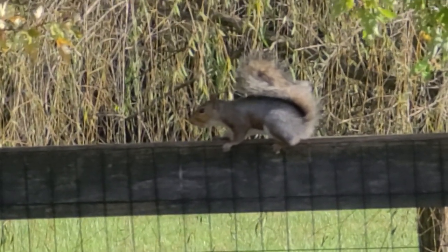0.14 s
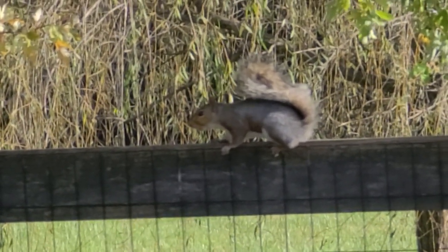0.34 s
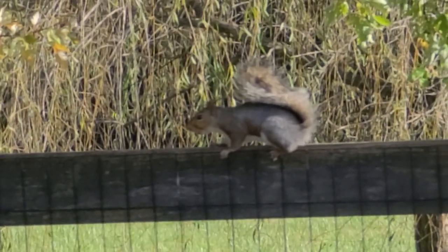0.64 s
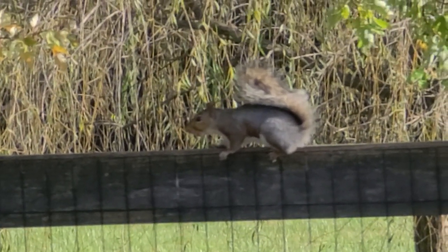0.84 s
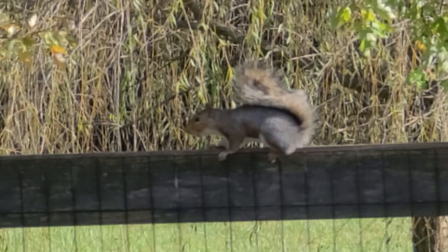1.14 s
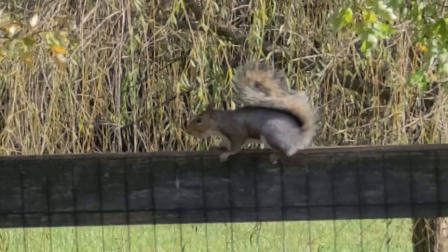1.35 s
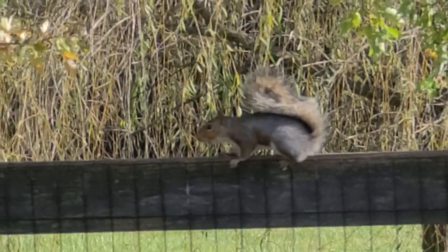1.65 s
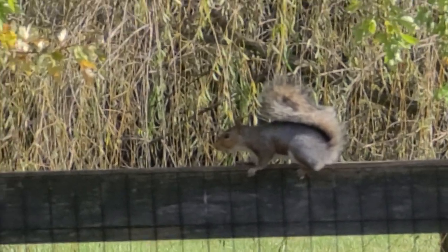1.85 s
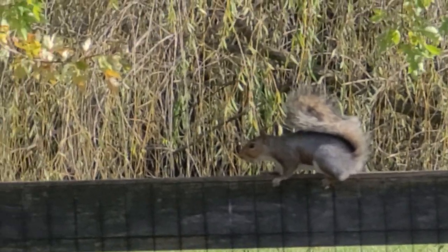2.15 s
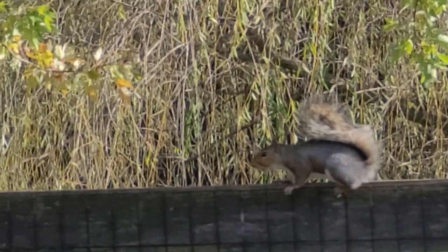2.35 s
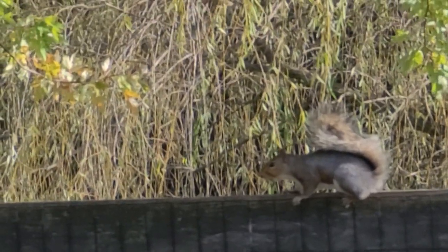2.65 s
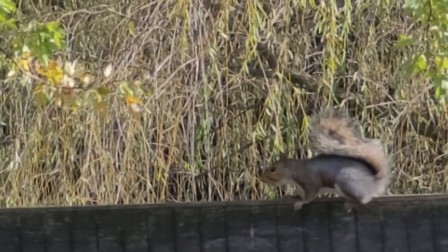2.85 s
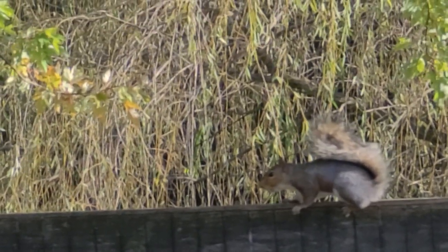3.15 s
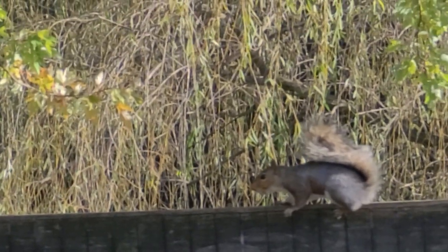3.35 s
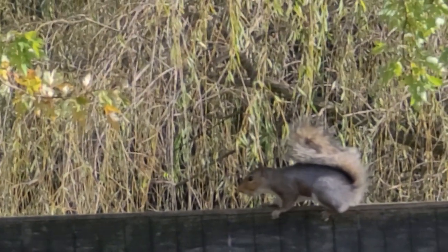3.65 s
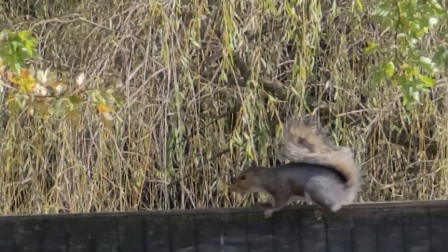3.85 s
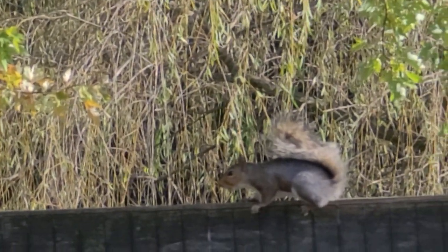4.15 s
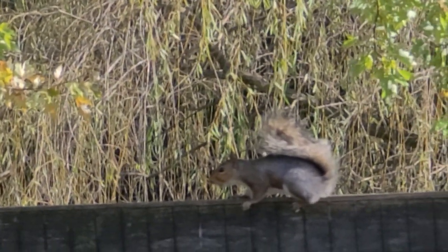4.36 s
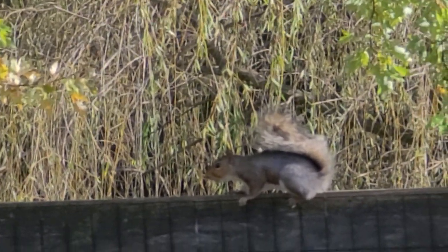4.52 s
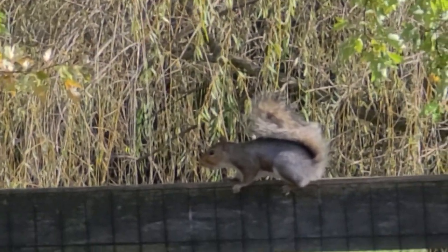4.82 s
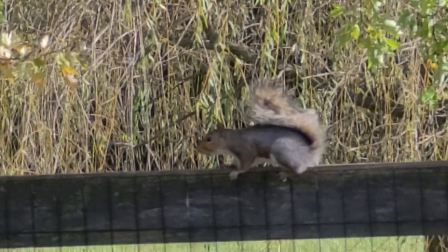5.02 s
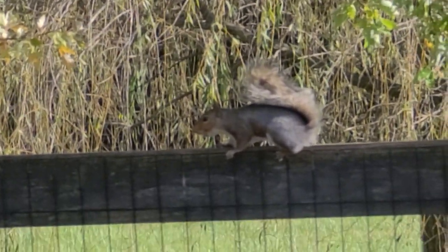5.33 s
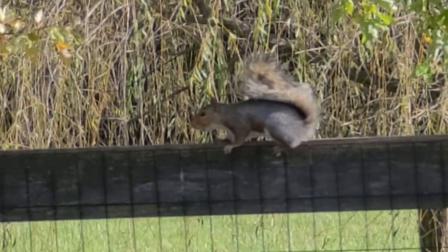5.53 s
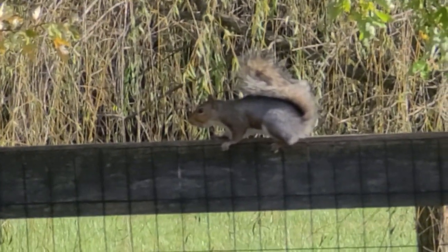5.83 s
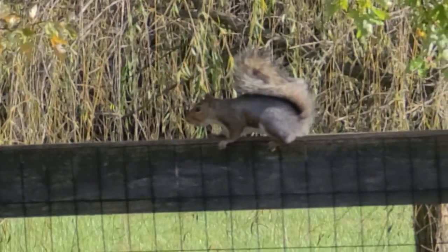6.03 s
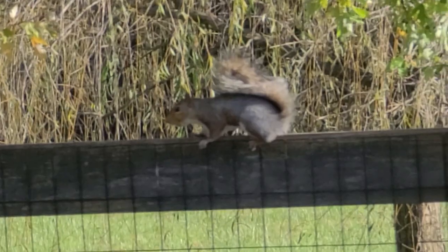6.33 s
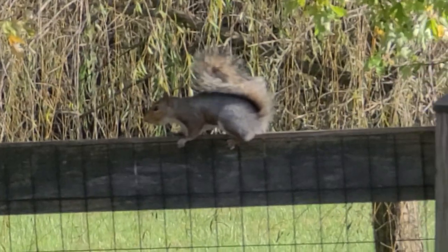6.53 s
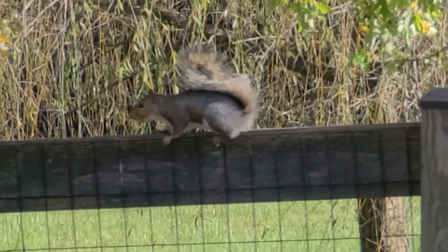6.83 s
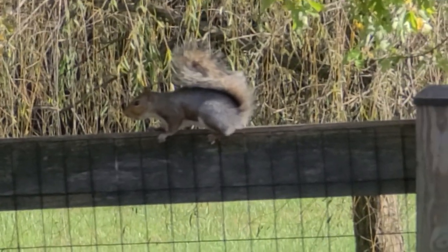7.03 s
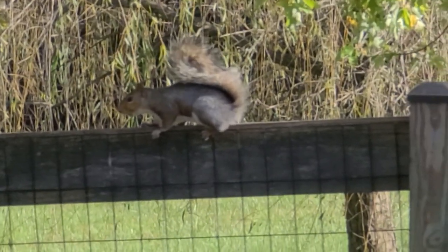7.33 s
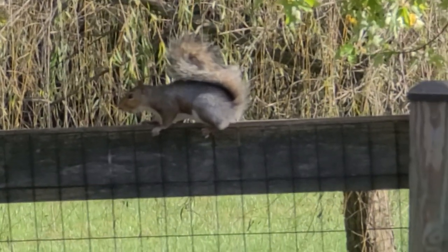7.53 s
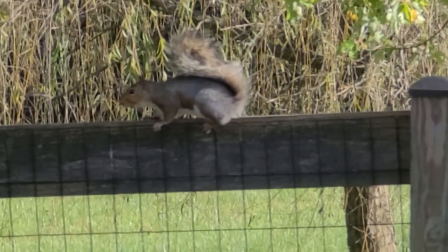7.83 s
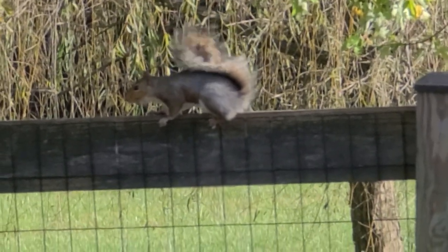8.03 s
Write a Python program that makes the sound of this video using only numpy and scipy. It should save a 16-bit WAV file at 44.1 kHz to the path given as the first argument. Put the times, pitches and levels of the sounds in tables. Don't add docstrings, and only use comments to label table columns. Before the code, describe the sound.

A quiet garden with deep, soft traffic rumble, airy leaf hiss and thin, high bush-cricket rasping on both sides. A very faint bird whistle dies away within 0.3 seconds. At 1.0 a squirrel calls close by, near centre: a tiny chirp, a harsh buzzy rasp, then a clearer nasal whine breaking into a small squeak, ending at 1.8. A distant vehicle drone swells faintly beneath, around 0.9 to 1.9. A similar, slightly louder call runs from 3.0 to 3.7. Cricket pairs and triplets chirp softly near 3.5, 3.9, 5.0, 5.6 and 6.4, with fainter ones farther off. A shorter, croaky call comes at 5.2 to 5.6. Tiny dry twig ticks crackle left at 6.0. Rough, noisy barks follow at 6.3, 6.6 (clipped), 7.2 (softer) and 8.0 (loudest). Short, dull fence and wall echoes colour the calls.

```python
import sys
import numpy as np
from scipy import signal
from scipy.io import wavfile
from scipy.ndimage import uniform_filter1d

SR = 44100
rng = np.random.default_rng(int(sys.argv[2]) if len(sys.argv) > 2 else 0)


def master(y):
    cut = np.clip(np.atleast_2d(y).T, -1, 1)
    pcm = np.round(cut * 32767)
    wavfile.write(sys.argv[1], SR, pcm.astype(np.int16))


def ratio_of_db(decibels):
    return 10 ** (np.asarray(decibels, float) / 20)


N = 360738
T = np.arange(N) / SR

FOLDS = {"shut": (.3, 1, -30), "chirp": (.04, 1, -30), "rasp": (.85, 1, -29), "strain": (.62, .45, -30),
         "clearing": (.45, 1, -32), "whine": (.06, 1, -36), "top": (.04, 1, -36), "break": (.04, 1, -36),
         "squeak": (.06, .03, -36), "fading": (.14, .03, -36), "done": (.3, .03, -36),
         "croak": (.9, 1, -28), "grind": (.7, .5, -28), "sag": (.6, .5, -30), "sob": (.2, .6, -34),
         "yelp": (.05, 1, -36), "puff": (.92, 1, -18), "bark": (.96, 1, -18), "closing": (.96, 1, -18),
         "spent": (.92, 1, -18)}
POSTURE = {"shut": (-71, -73, -75.5, -81, 0.6), "chirp": (-43.5, -42, -49, -62, 0.3),
           "rasp": (-46.5, -42.5, -57, -102, 0.5), "strain": (-45.5, -42, -61.5, -72, 0.53),
           "clearing": (-45.5, -45.5, -61, -53, 0.4), "whine": (-40.5, -52.5, -63.5, -52, 0.3),
           "top": (-40, -65, -70, -49.5, 0), "break": (-51.5, -59, -63, -56, 1),
           "squeak": (-60, -43, -60, -64, 0.2), "fading": (-65, -51, -64.5, -85, -0.02),
           "done": (-72, -64, -88, -78, 0.1), "croak": (-53, -47, -63.5, -79, 0.3),
           "grind": (-50.5, -44, -61.5, -85, 1.5), "sag": (-46, -48, -66, -66, .5),
           "sob": (-45, -52, -76, -55, .9), "yelp": (-60, -45.5, -74, -58, 2),
           "puff": (-81, -82, -58, -85, 3), "bark": (-49, -43.5, -48, -90, .35),
           "closing": (-53, -47, -60, -85, .35), "spent": (-63, -56, -75, -82, .35)}
# centre_hz, width_hz, level_db
TRACT = [
    [(2158, 450, 0.1)],
    [(2492, 280, 9), (2933, 273, 7), (3375, 340, -6)],
    [(750, 423, 16), (1140, 390, -34)],
    [(3860, 290, 10), (4080, 390, 26)],
]
# start_s, rasp_clears_s, voice_breaks_s, end_s, level_db
LONG_CALLS = [
    (1.02, 1.449, 1.643, 1.82, -0.76),
    (2.986, 3.385, 3.563, 3.705, -0.5),
]
# start_s, rasp_clears_s, voice_breaks_s, end_s, level_db
HOARSE_CALLS = [
    (5.17, 5.436, 5.53, 5.575, 0.1),
]
# start_s, hold_s, level_db, mouth_opening (0-1)
BARKS = [
    (6.337, 0.066, -0.6, 0.33),
    (6.566, .032, -2.5, 0.03),
    (7.203, 0.058, -3, 0.34),
    (8.012, .062, 0.4, .25),
]
# time_s, pitch_hz
PITCH_FIRST = [(1.025, 485), (1.05, 659.7), (1.13, 640), (1.3, 575), (1.48, 568.4), (1.635, 512.4),
               (1.665, 638), (1.72, 607), (1.79, 631)]
PITCH_SECOND = [(2.99, 500.7), (3.018, 661.3), (3.1, 631), (3.18, 572), (3.38, 567.5), (3.555, 522.5),
                (3.575, 630), (3.63, 586), (3.69, 658)]
PITCH_HOARSE = [(5.17, 599.6), (5.34, 590), (5.42, 515.4), (5.47, 551), (5.56, 584)]
BARK_HZ = 748
ATTACK_S, CHIRP_S, SETTLE_S, CLEAR_S, BREAK_S, FADE_S = .012, .0448, .015, .058, .012, .044
RASP_MIDDLE, WHINE_TOP = .67, .89
HOARSE_ATTACK_S = .036
BARK_ATTACK_S, BARK_RELEASE_S, BARK_SWELL_DB = .016, .03, 9

# start_s, strokes (count), first_gap_s, first_stroke_db
NEAR_CRICKET = [
    (.3237, 1, .05, -45.5),
    (3.494, 2, 0.05, -39.5),
    (3.945, 3, 0.048, -45.5),
    (4.996, 3, 0.05, -44.5),
    (5.6086, 3, 0.054, -44),
    (6.3725, 3, 0.051, -39),
]
FAR_CRICKET = [(.631, 1, .06, -62.5), (.757, 3, 0.059, -66.5), (1.732, 3, .063, -64), (2.13, 1, .06, -68),
               (2.39, 1, .06, -65), (2.792, 2, 0.063, -69), (3.665, 3, 0.044, -67.5),
               (3.886, 2, 0.034, -63), (4.101, 3, 0.11, -65), (4.421, 4, 0.045, -66),
               (5.925, 2, .067, -66.5), (6.651, 3, 0.063, -65), (7.047, 1, 0.056, -62),
               (7.265, 1, 0.062, -67), (7.811, 3, 0.058, -69)]
HIGH_CRICKET = [(.3815, 2, 0.058, -66), (1.128, 1, .055, -62), (2.313, 1, .055, -63.5),
                (2.788, 2, 0.053, -62), (3.408, 1, .055, -54), (4.038, 3, 0.05, -62.5),
                (4.692, 2, 0.038, -66), (4.789, 2, 0.061, -62.5), (5.492, 2, .056, -64),
                (6.024, 3, .051, -65), (6.767, 3, 0.046, -66), (7.32, 3, 0.047, -66.5),
                (8.071, 2, 0.052, -64)]
GAP_GROWTH, SWELL_DB = 1.074, 2
# time_s, level_db
TRILL_LEVEL = [(0, -74), (.5, -65), (1.0, -65), (2.1, -66), (2.6, -70), (4.1, -71)]
# start_s, peak_db
HEDGE_LOW = [(1.47, -52), (4.039, -53), (4.763, -68), (5.1, -57), (5.2, -59), (6.414, -60), (7.33, -58),
             (7.844, -55)]
HEDGE_HIGH = [(.133, -63), (.4065, -54), (.479, -54), (.86, -65), (1.035, -47.5), (1.181, -57),
              (1.338, -54), (1.449, -56), (1.611, -49), (2.132, -54), (2.718, -54), (3.009, -50),
              (3.16, -56), (3.306, -51.5), (3.429, -54.5), (3.892, -61), (4.402, -52), (4.919, -51),
              (5.581, -53), (6.997, -59), (7.073, -61), (7.512, -58), (8.0, -45)]
# tick (number), time_s
TICKER_BEAT = [(0, .10), (5, 1.515), (9, 2.84), (13, 4.095), (19, 5.905), (25, 7.98)]
# time_s, level_db
SHRILL_LEVEL = [(0, -75), (1.5, -73), (2.4, -78), (3.5, -62), (4.1, -68), (5.7, -74), (8.2, -78)]
CHORUS_DB = -68.5

# start_s, peak_db, left_right_db
TWIG = [
    (5.985, -43, 10),
    (5.9974, -49, 7.5),
    (6.006, -42, 14),
    (6.016, -34.5, 21.5),
]
# time_s, pitch_hz, level_db
WHISTLE = [
    (0.0, 2014, -72),
    (0.262, 2190, -85),
    (0.3, 1954, -90),
]
# start_s, peak_db
PASSING = [
    (.9, -69.5),
]
# frequency_hz, density_db (per Hz)
AIR = [(12, -38), (20, -15), (65, -1), (104, -10.5), (204, -25), (367, -20), (590, -24), (759, -22),
       (1060, -29.5), (3530, -33), (4540, -29.5), (6010, -43.5), (8180, -35), (10500, -42.5), (16000, -39)]
# frequency_hz, left_right_likeness (-1 to 1)
LIKENESS = [(60, 0.87), (180, 0.74), (550, 0.079), (1650, -0.00024), (4970, -0.23), (15000, -0.00069)]
# frequency_hz, left_right_db
TILT = [(60, -0.5), (110, -0.5), (200, -1.5), (380, -1.5), (700, 1), (1290, -0.5), (2380, -1.5), (4400, 0),
        (8120, 2), (15000, 4)]
# delay_s, level_db, side (0 left, 1 right)
ECHOES = [(.0009, -10, 0), (.0031, -8, 0), (.0042, -8, 1), (.0057, -9, 0), (.0083, -9, 1), (.021, -16, 0),
          (.029, -16, 1), (.044, -21, 0), (.063, -22, 1), (.081, -24, 0), (.104, -26, 1)]


def squirrel():
    calls = call_postures()
    rows = [row for call in calls for row in call]
    rough, odd, hiss_db = in_time([(s, *FOLDS[name]) for s, name, db in rows])
    *levels_db, opening = in_time([(s, *POSTURE[name]) for s, name, db in rows])
    levels_db = np.array(levels_db) + in_time([(s, db) for s, name, db in rows])
    folds, breath = vocal_folds(rough, odd)

    bark_opening, = in_time([(start + hold, wide) for start, hold, db, wide in BARKS])
    opening = np.clip(np.where(T < BARKS[0][0], opening, bark_opening), 0, 1)
    mode_shares = [(1,), (1 - opening, opening, opening), (1, 1), (1, 1)]
    voice = rms_one(resonate_twice(breath, 8500, 2800)) * ratio_of_db(levels_db[0] + hiss_db + 8)
    for modes, level_db, shares in zip(TRACT, levels_db, mode_shares):
        cavity = 0
        for (hz, width, db), share in zip(modes, shares):
            cavity = cavity + share * ratio_of_db(db) * resonate_twice(folds, hz, .9 * width)
        running_rms = np.sqrt(uniform_filter1d(cavity ** 2, size=1300) + 1e-9)
        voice = voice + ratio_of_db(level_db) * cavity / running_rms

    sounding = 0
    for call in calls:
        inside_s = np.minimum(T - call[0][0], call[-1][0] - T)
        sounding = sounding + np.clip(inside_s / .008 + .5, 0, 1)
    return voice * sounding


def vocal_folds(rough, odd):
    pitch_hz, = in_time(PITCH_FIRST + PITCH_SECOND + PITCH_HOARSE + [(BARKS[0][0], BARK_HZ)])
    jitter = (.006 + .025 * rough) * drift(60)
    phase = 2 * np.pi * np.cumsum(pitch_hz * (1 + jitter)) / SR
    waver_db = (.8 + 3.2 * (1 - odd)) * drift(40)
    uneven = 1 + 1.3 * rough * np.cos(phase / 2)
    partials = 0
    for k in range(1, 9):
        strength = (odd if k % 2 else 1) * (uneven if k > 2 else 1)
        partials = partials + np.cos(k * phase) * strength * ratio_of_db(waver_db * (-1) ** (k // 2))
    breath = rng.standard_normal(N) * (1 + .22 * np.cos(phase)) * ratio_of_db(1.2 * drift(87))
    thin = resonate(resonate(breath, 1600, 6200), 1760, 6300)
    return np.sqrt(1 - rough) * partials / 2 + 4.2 * np.sqrt(rough) * thin, breath


def call_postures():
    calls = []
    for start, clears, breaks, end, db in LONG_CALLS:
        calls.append([
            (start, "shut", db), (start + ATTACK_S, "chirp", db - 5), (start + CHIRP_S, "chirp", db),
            (start + CHIRP_S + SETTLE_S, "rasp", db),
            (start + RASP_MIDDLE * (clears - start), "strain", db),
            (clears, "clearing", db), (clears + CLEAR_S, "whine", db),
            (clears + WHINE_TOP * (breaks - clears), "top", db),
            (breaks, "break", db), (breaks + BREAK_S, "squeak", db),
            (end - FADE_S, "fading", db), (end, "done", db)])
    for start, clears, breaks, end, db in HOARSE_CALLS:
        calls.append([
            (start, "shut", db + 12), (start + HOARSE_ATTACK_S, "croak", db),
            (start + RASP_MIDDLE * (clears - start), "grind", db), (clears, "sag", db),
            (breaks, "sob", db), (breaks + BREAK_S, "yelp", db), (end, "spent", db)])
    for start, hold, db, opening in BARKS:
        opened = start + BARK_ATTACK_S
        calls.append([
            (start, "puff", db), (opened, "bark", db - BARK_SWELL_DB), (opened + hold / 2, "bark", db),
            (opened + hold, "closing", db), (opened + hold + BARK_RELEASE_S, "spent", db)])
    return calls


def cricket(pulses, length, fall, overtone_db):
    out, u = np.zeros(N), np.linspace(0, 1, int(length * SR))
    bend = 1 + fall * (.3 - u ** 3 - .47 * (1 - u) ** 4)
    swell = 1.3 * u ** .9 * (1 - u ** 9)
    for s, db, hz in pulses:
        phase = 2 * np.pi * np.cumsum(hz * bend) / SR
        stroke = np.sin(phase) + ratio_of_db(overtone_db) * (np.sin(2 * phase) + np.sin(3 * phase))
        at = int((s - .005) * SR)
        out[at:at + len(u)] += (ratio_of_db(db) * stroke * swell)[:N - at]
    return out


def strokes(chirps, hz, rise_hz, spread_hz):
    rows = []
    for s, count, gap, db in chirps:
        for k in range(int(round(count))):
            at = s + gap * sum(GAP_GROWTH ** j for j in range(k))
            pitch_hz = hz + rise_hz * k + spread_hz * rng.standard_normal()
            rows.append((at, db + SWELL_DB * k, pitch_hz))
    return rows


def ground_cricket():
    tone = np.sin(2 * np.pi * np.cumsum(5740 * (1 + .005 * drift(34))) / SR)
    throb = (.35 + np.sin(np.pi * 20 * T) ** 2) * ratio_of_db(3.5 * drift(29))
    trills = phrases(steady(start=0, every=.51, count=9, level=TRILL_LEVEL), .14)
    return ratio_of_db(-10) * trills * tone * throb


def bush_crickets():
    number, s = np.transpose(TICKER_BEAT)
    tick_s = np.interp(np.arange(number[-1] + 1), number, s)
    ticks = [(at, -63 + 1.2 * rng.standard_normal()) for at in tick_s]
    shrill_rows = steady(start=.107, every=.196, count=41, level=SHRILL_LEVEL)
    shrill = phrases([(at, db + 3 * rng.standard_normal()) for at, db in shrill_rows], .033)
    low = ratio_of_db(CHORUS_DB - 8) + ratio_of_db(-15) * phrases(HEDGE_LOW, .068) + ratio_of_db(-7.5) * shrill
    high = ratio_of_db(CHORUS_DB - 4.5) + ratio_of_db(-13) * phrases(HEDGE_HIGH, .066)
    ticker = ratio_of_db(-13) * phrases(ticks, .052)
    overtone = ratio_of_db(-12) * shrill
    # centre_hz, width_hz, gain
    singers = [(7540, 770, low), (8190, 790, high), (9600, 480, ticker), (15100, 900, overtone)]
    burst_phase = 2 * np.pi * np.cumsum(92 * (1 + .12 * drift(8))) / SR
    bursts = (1 + .6 * np.sin(burst_phase)) * ratio_of_db(2.5 * drift(12))
    out = 0
    for hz, width, gain in singers:
        mid, side = rng.standard_normal((2, N)) * bursts
        teeth = np.array([mid + .72 * side, mid - 1.03 * side])
        out = out + gain * rms_one(resonate_twice(teeth, hz, width))
    return out * ratio_of_db(np.array([[.8], [-.8]]))


def twig():
    out, since = np.zeros((2, N)), np.arange(2000) / SR
    decay = np.exp(-since / .0005) + .08 * np.exp(-since / .006)
    for s, db, pan_db in TWIG:
        burst = resonate(rng.standard_normal(len(since)) * decay, 4400, 14000)
        sides = ratio_of_db(db - 6.5 + pan_db / 2 * np.array([[1], [-1]]))
        at = int(s * SR)
        out[:, at:at + len(since)] += sides * burst
    return out


def whistle():
    hz, db = in_time(WHISTLE)
    fade = np.clip((WHISTLE[-1][0] - T) / .03, 0, 1)
    return np.sqrt(2) * ratio_of_db(db) * np.sin(2 * np.pi * np.cumsum(hz) / SR) * fade


def vehicle():
    drone = resonate(resonate(rng.standard_normal(N), 160, 170), 164, 178)
    return phrases(PASSING, 1.02) * rms_one(drone)


def air(patchy_db):
    out, edges = 0, 20 * 2 ** (np.arange(30) / 3)
    white = rng.standard_normal((2, 2, N + 8000))
    for k, (low, high) in enumerate(zip(edges, edges[1:])):
        band = signal.butter(2, [low, high], "band", fs=SR, output="sos")
        mid, side = signal.sosfilt(band, white[k % 2])[:, -N:]
        hz = np.sqrt(low * high)
        alike = np.clip(at_hz(LIKENESS, hz), -1, 1)
        lean = ratio_of_db(at_hz(TILT, hz) / 2 * np.array([[1], [-1]]))
        level = ratio_of_db(at_hz(AIR, hz) + patchy_db * drift(4.9))
        stereo = np.sqrt(1 + alike) * mid + np.sqrt(1 - alike) * side * [[1], [-1]]
        out = out + lean * level * stereo
    return ratio_of_db(-55.5) * rms_one(out)


def garden(x):
    out, dull = np.zeros((2, N)), signal.lfilter([.6], [1, -.4], x)
    for s, db, side in ECHOES:
        lag = int(s * SR)
        out[side, lag:] += ratio_of_db(db) * dull[:-lag]
    return out


def place(x, pan_db=0, lag=0):
    left = np.interp(np.arange(N) - lag, np.arange(N), x)
    return np.array([left * ratio_of_db(pan_db / 2), x * ratio_of_db(-pan_db / 2)])


def resonate(x, hz, width):
    r = np.exp(-np.pi * width / SR)
    poles = [1, -2 * r * np.cos(2 * np.pi * hz / SR), r * r]
    return signal.lfilter([(1 - r * r) / 2, 0, (r * r - 1) / 2], poles, x)


def resonate_twice(x, hz, width):
    return resonate(resonate(x, hz, width), hz, width)


def phrases(starts, length):
    out, swell = np.zeros(N), np.sin(np.pi * np.linspace(0, 1, int(length * SR))) ** .28
    for s, db in starts:
        at = int(s * SR)
        out[at:at + len(swell)] += ratio_of_db(db) * swell[:N - at]
    return out


def steady(start, every, count, level):
    s = start + every * np.arange(count)
    return np.transpose([s, np.interp(s, *np.transpose(level))])


def drift(rate):
    r = np.exp(-16 * np.pi * rate / SR)
    slow = signal.lfilter([1], [1, -2 * r, r * r], rng.standard_normal(N // 8 + 4002))[4000:]
    return np.interp(np.arange(N) / 8, np.arange(len(slow)), rms_one(slow - slow.mean()))


def rms_one(x):
    return x / np.sqrt(np.mean(x ** 2) + 1e-20)


def in_time(rows):
    s, *columns = np.transpose(rows)
    return [np.interp(T, s, c) for c in columns]


def at_hz(points, hz):
    point_hz, value = np.transpose(points)
    return np.interp(np.log(hz), np.log(np.maximum(point_hz, 1)), value)


def scene():
    voice = squirrel()
    near = cricket(strokes(NEAR_CRICKET, 3740, rise_hz=40, spread_hz=30), .021, fall=.095, overtone_db=-32)
    far = cricket(strokes(FAR_CRICKET, 4170, rise_hz=15, spread_hz=90), .0302, fall=.064, overtone_db=-40)
    high = cricket(strokes(HIGH_CRICKET, 4690, rise_hz=3, spread_hz=5), .025, fall=.0044, overtone_db=-46)
    echoes = ratio_of_db(1) * garden(voice) + ratio_of_db(-4.5) * garden(near)
    echoes[1] -= ratio_of_db(-4) * place(voice, lag=.00115 * SR)[0]
    animals = place(voice, pan_db=4, lag=-2.72) + place(near, pan_db=1.8, lag=-2)
    animals += place(far, pan_db=-3) + place(high, pan_db=-6)
    animals += place(ground_cricket(), pan_db=-10) + bush_crickets()
    return animals + echoes + twig() + place(whistle() + vehicle()) + air(patchy_db=1.87)


def top_cut(x):
    return signal.sosfilt(signal.butter(12, 16610, fs=SR, output="sos"), x)


def record(dry):
    low_pass = signal.ellip(12, .5, 70, 15740, fs=SR, output="sos")
    mix = signal.sosfilt(low_pass, dry)
    return top_cut(mix)


dry = scene()
out = record(dry)
master(out)
```